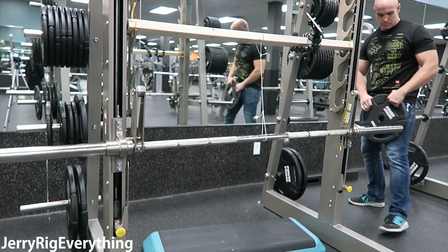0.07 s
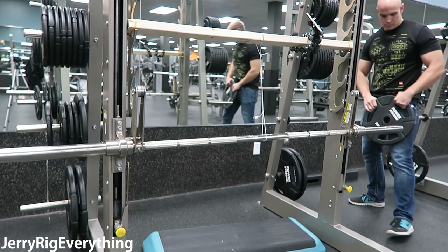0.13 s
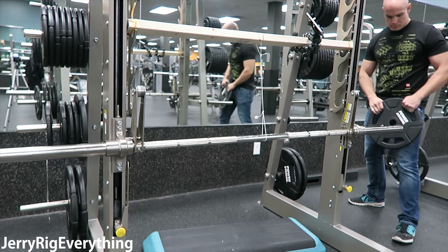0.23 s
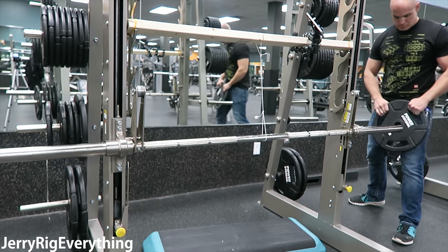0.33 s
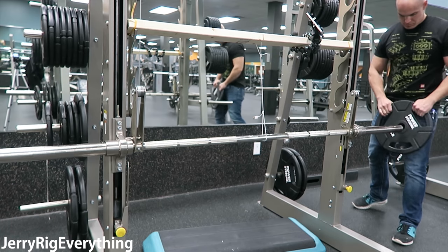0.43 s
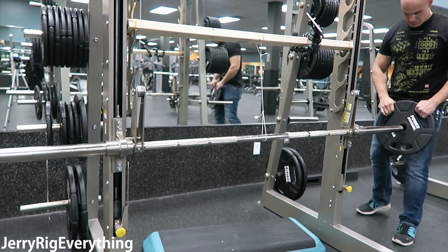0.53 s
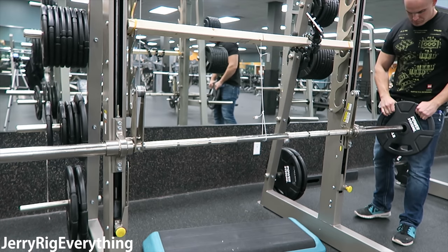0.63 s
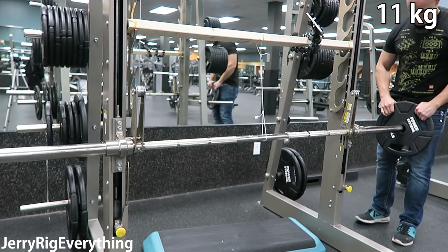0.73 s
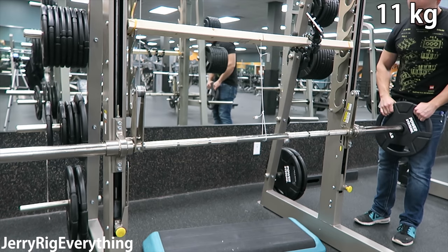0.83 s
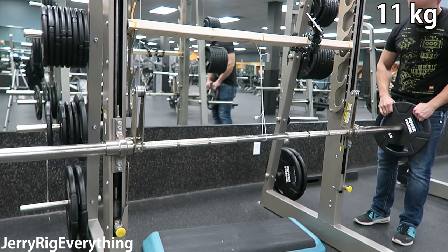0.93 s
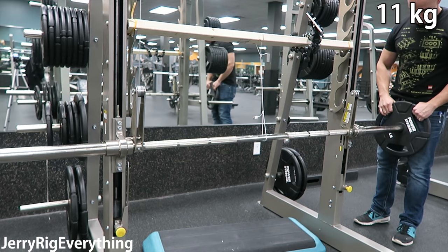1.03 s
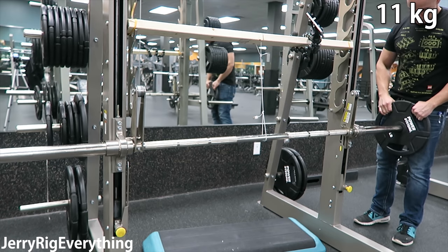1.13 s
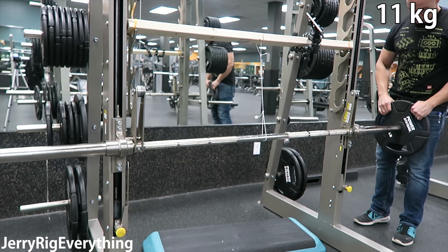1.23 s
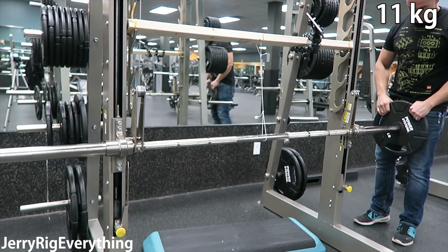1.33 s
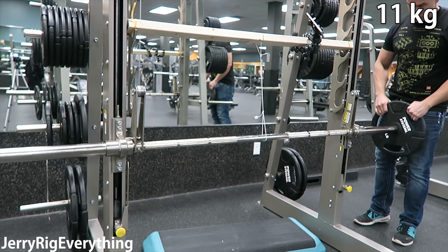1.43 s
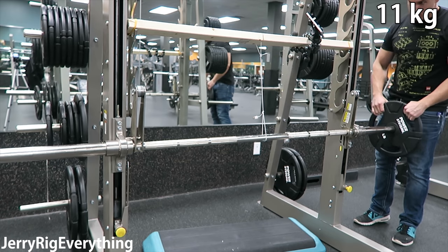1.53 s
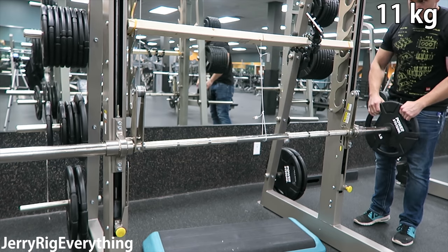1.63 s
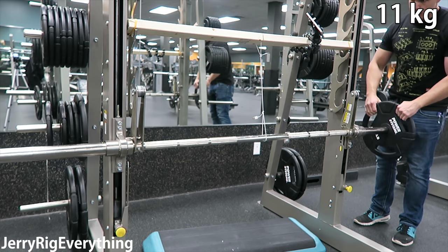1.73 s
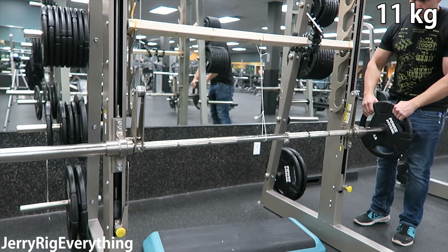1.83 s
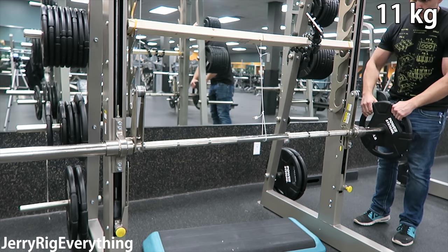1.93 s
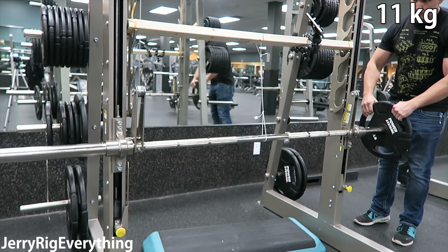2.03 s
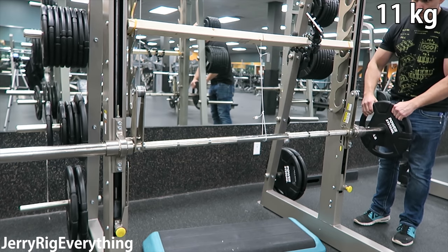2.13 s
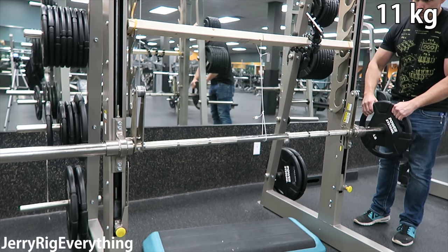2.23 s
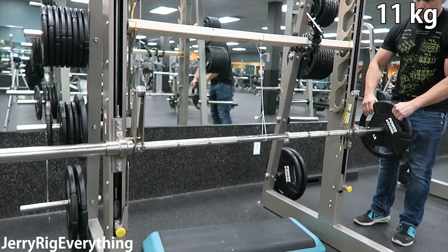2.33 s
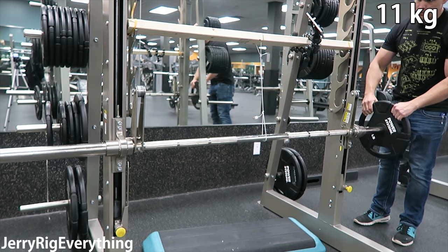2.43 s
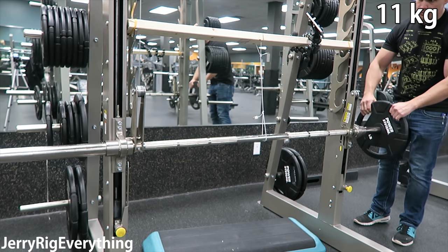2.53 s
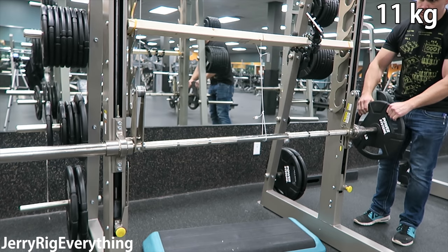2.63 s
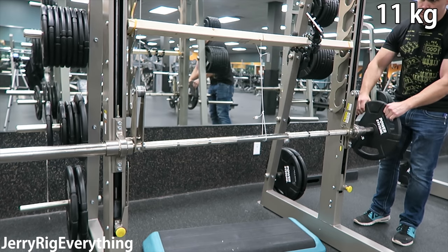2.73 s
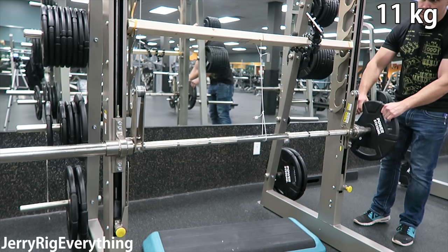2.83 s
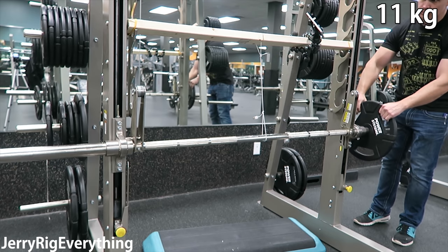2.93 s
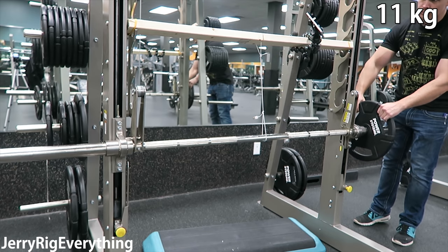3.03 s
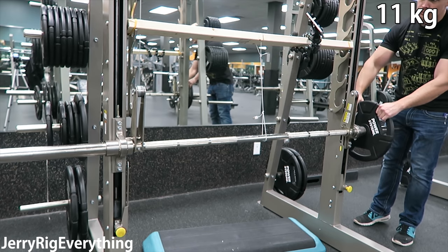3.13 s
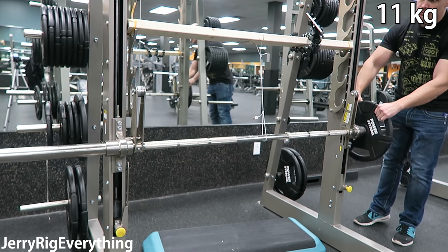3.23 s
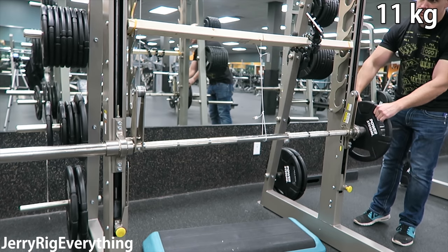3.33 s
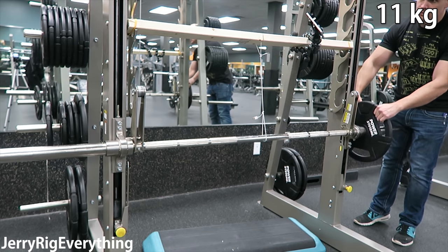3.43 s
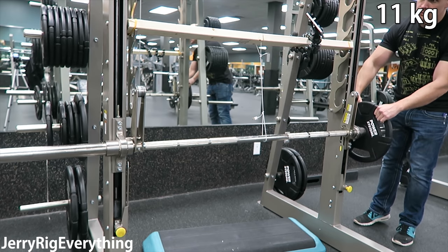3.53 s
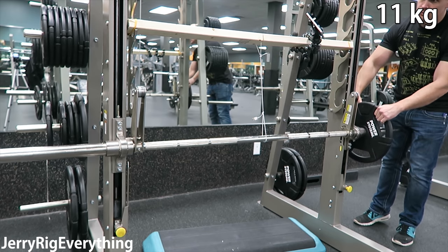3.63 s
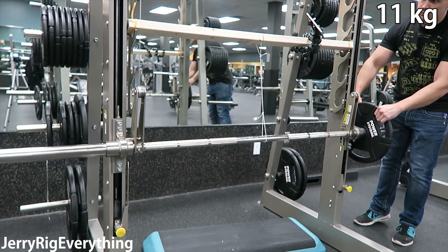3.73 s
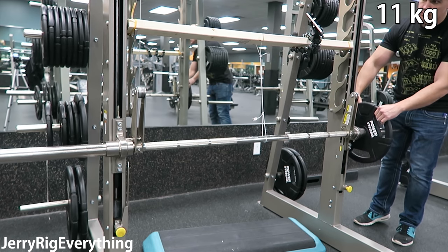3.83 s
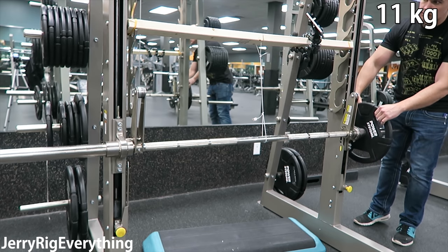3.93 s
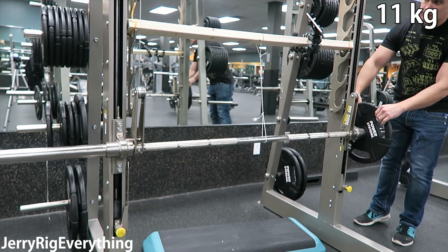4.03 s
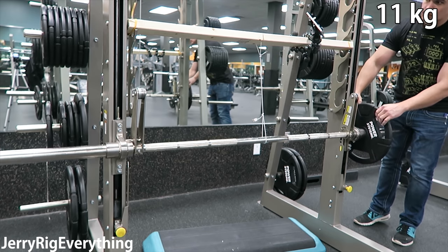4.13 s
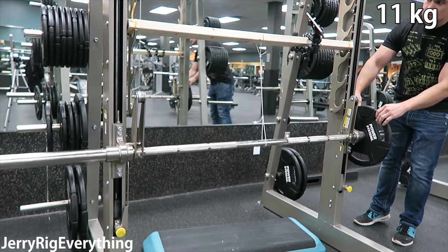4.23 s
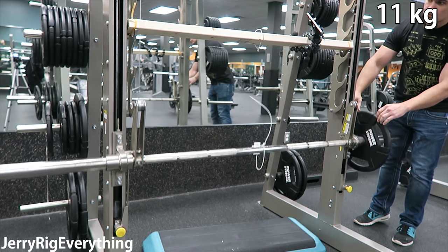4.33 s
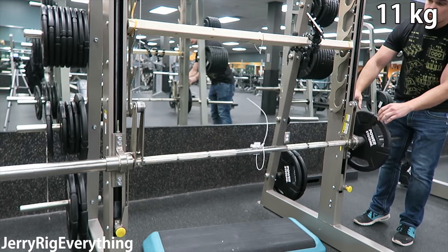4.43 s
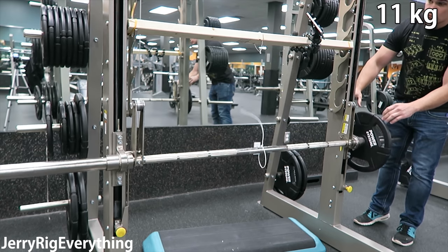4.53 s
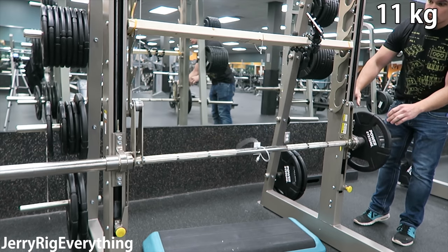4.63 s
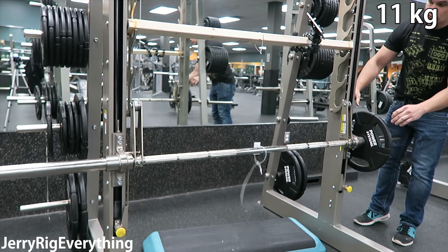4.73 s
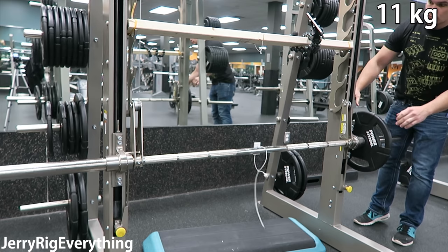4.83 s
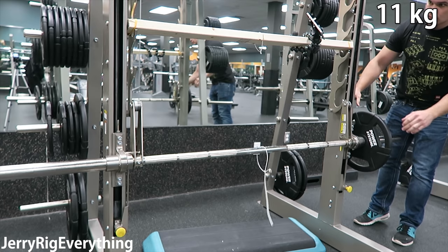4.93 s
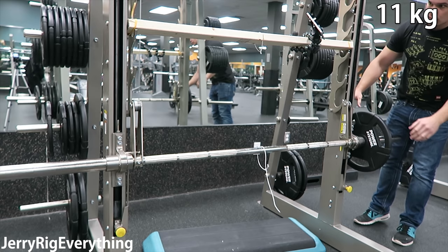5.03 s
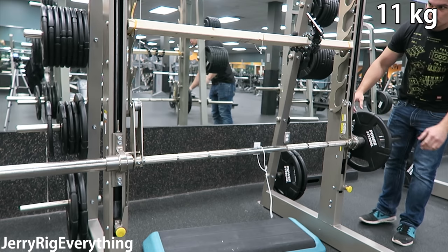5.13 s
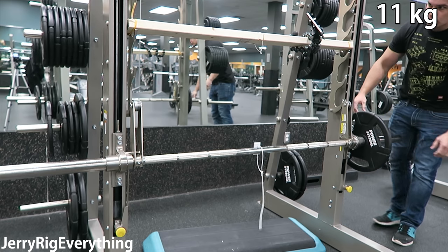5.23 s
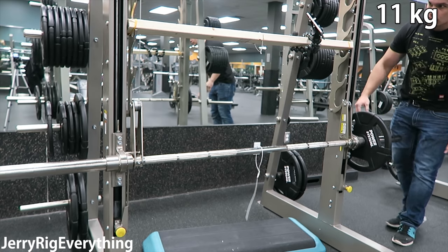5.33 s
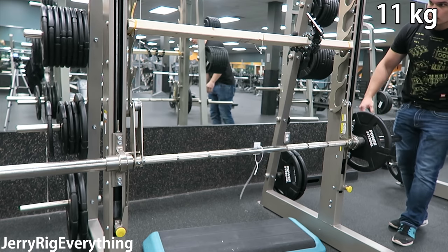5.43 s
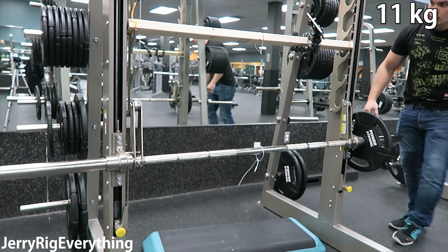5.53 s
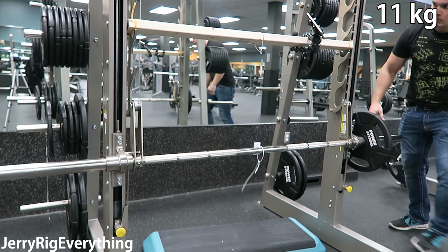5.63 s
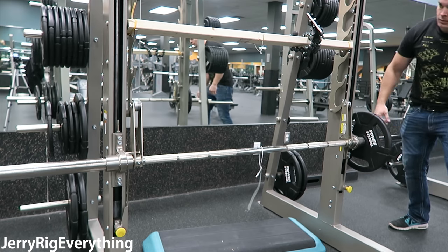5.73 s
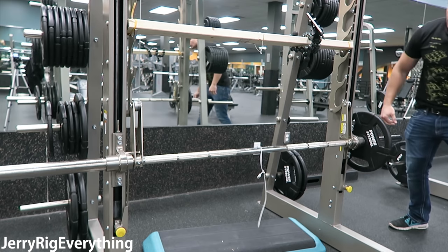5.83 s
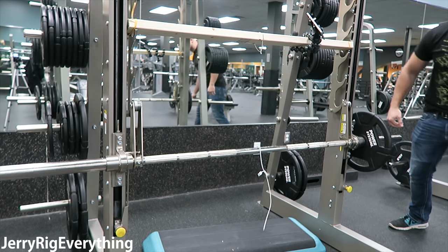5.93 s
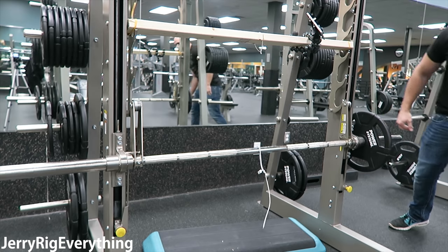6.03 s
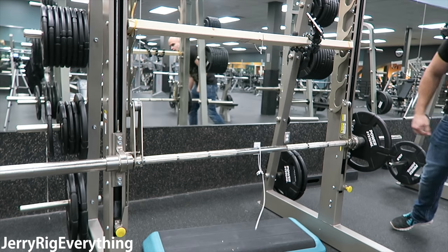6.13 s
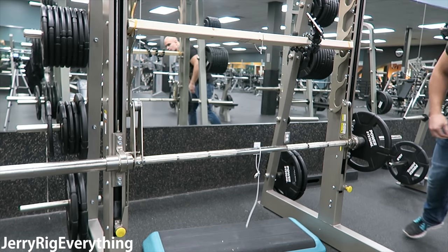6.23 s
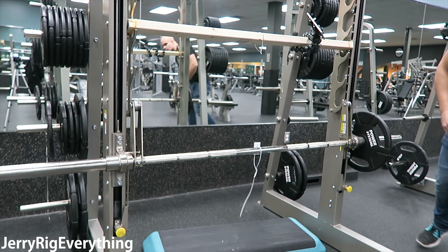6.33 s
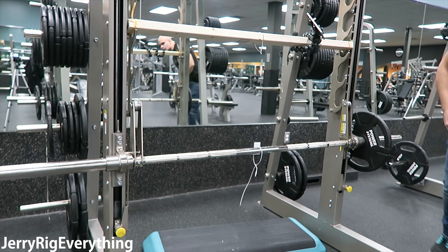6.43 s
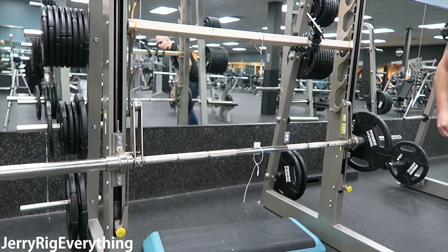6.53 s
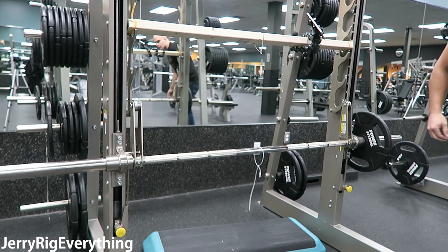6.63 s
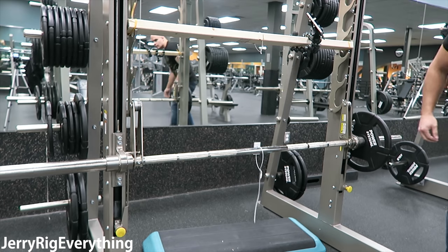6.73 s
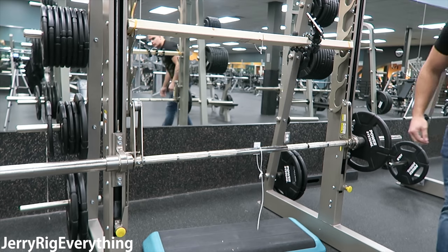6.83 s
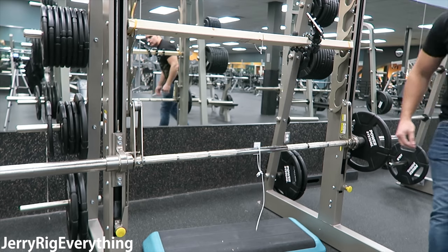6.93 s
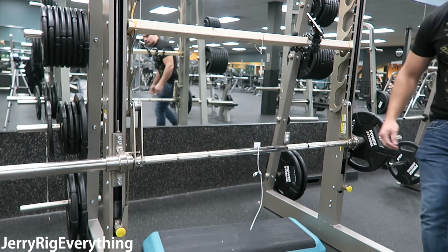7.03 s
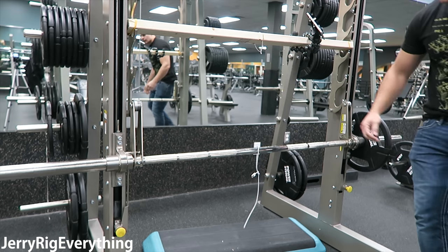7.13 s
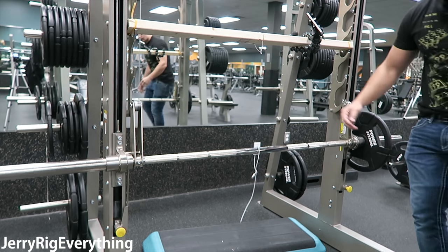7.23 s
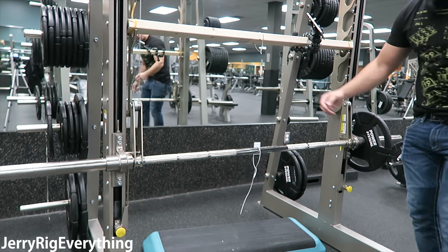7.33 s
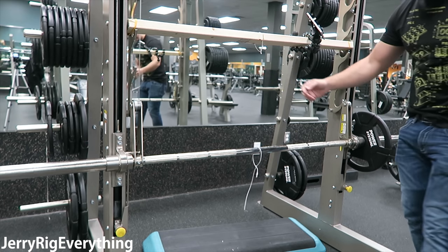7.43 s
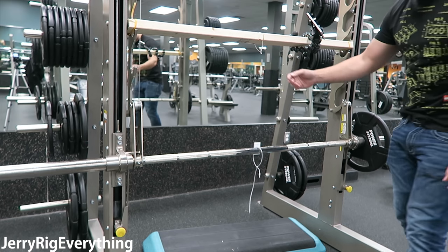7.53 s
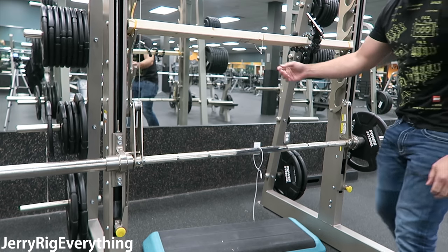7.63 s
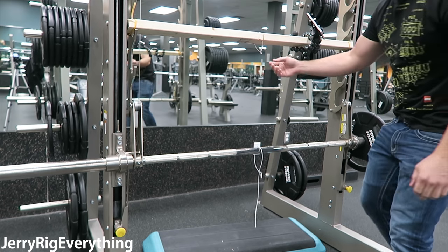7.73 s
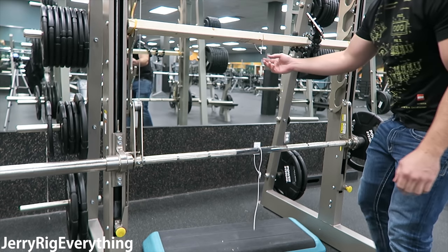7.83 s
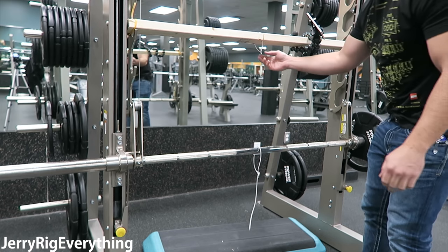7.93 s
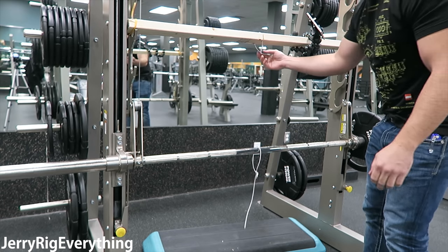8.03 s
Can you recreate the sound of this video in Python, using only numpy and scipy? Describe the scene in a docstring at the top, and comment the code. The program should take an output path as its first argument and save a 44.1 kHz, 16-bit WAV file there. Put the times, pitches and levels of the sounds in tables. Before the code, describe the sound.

In a rumbling gym, an iron plate knocks and scrapes onto a bar, then a hook clacks free and the bar slides down, squealing, to a loud landing.

```python
"""Ventilation rumbles first, as filtered noise, with shoes and clothes stirring nearby as soft noise bursts.
In this gym an iron plate is worked onto a guided barbell's sleeve: knocks ring modes, drags stick and slip.
The bar's hook clacks free on its pegs; the bar slides down its rails with squeals and lands.
Low decaying tones give the weight, steady ones the bar's hum, and diffuse noise tails the room.
An automatic gain sinks while the sound is loud and climbs back afterwards."""
import sys
import numpy as np
from scipy import signal
from scipy.fft import rfft, irfft, next_fast_len
from scipy.io import wavfile
from scipy.ndimage import uniform_filter1d, map_coordinates

SR = 44100
rng = np.random.default_rng(int(sys.argv[2]) if len(sys.argv) > 2 else 0)


def store_wav(level_fs):
    """Save 16-bit WAV to argv[1]."""
    pcm = np.round(np.clip(np.atleast_2d(level_fs), -1, 1) * 32767)
    wavfile.write(sys.argv[1], SR, pcm.T.astype(np.int16))


N = 355798

# All levels apply before the automatic gain.
# ventilation spectrum before the duct lift: (frequency [Hz], relative density [dB/Hz])
AIR_SPECTRUM = [(12, -39), (20, -12.5), (54, 0.5), (101, -7), (137, -0.5), (161, -7.5), (191, -2.5),
                (232, -6), (315, -10.5), (534, -19.5), (958, -21.5), (3260, -32), (6020, -48), (11700, -59),
                (15500, -84)]
# duct resonances: (frequency [Hz], width [Hz], lift [dB])
DUCT_RESONANCES = [(65.6, 14.6, 5.5), (136.3, 5.8, 5.5), (180, 35, 3), (331.5, 34, 4.5)]
# stereo spread of the ventilation: (frequency [Hz], side minus mid [dB])
AIR_SIDE_LEVELS = [(60, -34.5), (110, -23), (200, -16), (380, -4), (700, -5), (1290, -7.5), (2380, -9),
                   (4400, -2.5), (8120, 1), (15000, 2)]
AIR_DB = -35.5  # rms of the mid

# shoes and cloth: (time [s], swish level [dB], thud re swish [dB])
STIR_EVENTS = [(0.12, -54.5, 1), (0.51, -55, -11), (0.845, -47.5, -24), (1.17, -57, 0), (1.37, -51, -14),
               (1.749, -54.5, 7), (2.0, -51.5, 0), (2.1, -56, 5), (3.885, -54.5, -3), (5.485, -57, 15),
               (5.691, -50, -1), (5.985, -70, 23.5), (6.1, -63, 15), (7.411, -46.5, 1.5),
               (7.57, -52.5, -18), (7.81, -50.5, -3), (8.022, -48.5, 1.5)]
STIR_HZ, STIR_SIZZLE_DB, STIR_RING_DB, STIR_RISE_S, STIR_DECAY_S = 1417, -14.5, -26, 0.0032, 0.043

# metal dragging on metal, one list a stroke: (time [s], thud level [dB], clank re thud [dB])
DRAG_STROKES = [
    [(1.06, -58, -20), (1.15, -51, -27), (1.26, -44, -36)],
    [(2.62, -41.5, -27), (2.79, -46.5, -21), (2.91, -40.5, -34), (3.07, -60, -26)],
    [(3.39, -30, -11), (3.5, -47, -10), (3.56, -63, -10)],
    [(4.44, -27.5, -12.5), (4.52, -20, -16), (4.6, -27.5, 7.5), (4.7, -23, -8), (4.8, -28, 3),
     (4.92, -27.5, 5), (4.98, -23.5, -7), (5.03, -29, -14)],
]
DRAG_SIZZLE_DB = -12  # re clank

# plate meeting bar: (time [s], strength [dB], favoured frequency [Hz], sizzle re clank [dB],
# ring re contact noise [dB], contact time [s])
KNOCK_EVENTS = [(1.075, -39.5, 500, -21, -6, 0.091), (1.26, -28.5, 748, -9, 1.5, 0.034),
                (1.28, -35, 2740, -11, -4.5, 0.017), (1.536, -25, 2600, -24.5, 6.5, 0.017),
                (1.546, -26, 2180, -27, -1.5, 0.027), (1.549, -19, 1190, -22, 1, 0.011),
                (1.56, -20.5, 980, -28, 2.5, 0.0061), (1.58, -30, 530, -25, -2, 0.0086),
                (1.594, -35, 1190, -30, 7, .02), (1.608, -34, 975, -28, 8, 0.022),
                (1.784, -51, 2900, -31, 8, 0.013), (2.032, -37, 694, -15, -5, 0.017),
                (2.08, -49.5, 2860, -14, 3, .009), (2.18, -34, 680, -13, -8, 0.029),
                (2.385, -39.5, 1440, -34, -6, 0.026), (2.65, -45, 606, -30, -11, .05),
                (2.8, -34, 1065, -27, 8, 0.04), (2.835, -30.5, 500, -28, 1, 0.013),
                (2.82, -37, 1190, -25, 5, 0.036), (2.939, -36.5, 540, -27, -3, 0.024),
                (3.35, -29.5, 2200, -8, -2, 0.016), (3.357, -28, 2870, -9.5, 4, 0.021),
                (3.372, -27.5, 700, -8, 0, 0.032), (3.412, -37, 990, -12, 5, 0.016),
                (3.463, -41, 1050, -24, 0, .008), (3.478, -48, 3660, -12, 3, 0.013),
                (3.49, -50, 4590, -11, -6, .012), (4.383, -20, 597, -17, -2, 0.015),
                (4.468, -20.5, 2360, -13.5, -5, 0.012), (4.483, -15, 535, -12.5, -0.5, 0.042),
                (4.519, -29, 3300, -3.5, -5.5, 0.018), (4.545, -23.5, 2900, -6, 0, 0.025),
                (4.578, -7, 2120, -17, -9.5, 0.0085), (4.6, -13, 680, -9.5, 3, 0.013),
                (4.618, -28, 2300, -12, -5.5, 0.0059), (4.708, -23.5, 3300, -13, -6, 0.012),
                (4.778, -23.5, 2130, -20.5, 0.5, 0.0056), (4.82, -18, 4000, -11.5, -4.5, 0.0043),
                (4.827, -18.5, 3400, -11.5, -17, 0.015), (4.849, -9, 2780, -13, 3.5, 0.0085),
                (4.862, -9.5, 2850, -16, -6, 0.011), (4.865, -7, 530, -10, -3, 0.0041),
                (4.885, -13.5, 970, -21, -2, 0.017), (4.97, -13.5, 740, -19, -3, 0.021),
                (5.0, -23.5, 620, -35, -2, .015)]
# the lower a knock lands and the weaker it is, the more thud and the less clank
EVEN_HZ, THUD_DB_PER_OCTAVE, FIRM_DB, THUD_DB_PER_DB = 2940, 9.5, -18, 0.7
RISE_SHARE = 0.34  # rise time over contact time

# one mode singing under friction: (time [s], hold [s], frequency [Hz], level before flutter [dB])
SQUEAL_EVENTS = [(1.284, .02, 2874, -40), (1.288, 0.023, 5370, -55), (1.29, 0.026, 4590, -48),
                 (1.312, 0.014, 2925, -42), (1.338, 0.026, 2930, -46), (1.538, 0.014, 2720, -32),
                 (1.54, 0.018, 2330, -28), (1.56, 0.029, 1890, -32), (1.558, 0.015, 977, -20),
                 (1.538, 0.027, 3110, -34), (3.358, 0.016, 2840, -33), (3.358, 0.017, 3700, -35.5),
                 (4.508, .012, 4320, -34), (4.53, .06, 7250, -44), (4.535, 0.047, 3650, -29),
                 (4.544, 0.036, 4560, -27.5), (4.551, .05, 5260, -43), (4.644, 0.043, 4640, -35),
                 (4.65, 0.025, 2890, -38), (4.675, 0.028, 3660, -32), (4.706, 0.021, 4400, -27),
                 (4.71, 0.033, 4770, -31), (4.746, 0.097, 2860, -27), (4.75, .03, 7250, -40.5),
                 (4.775, 0.013, 2120, -19.5), (4.784, 0.017, 4540, -31), (4.822, .012, 4250, -22),
                 (4.875, .03, 2895, -20), (4.885, 0.029, 2225, -18), (4.91, 0.028, 2690, -17),
                 (4.929, 0.033, 2940, -30), (4.969, 0.025, 2760, -22.5), (5.0, 0.033, 2940, -37)]
SQUEAL_RISE_S, SQUEAL_T60_S, SQUEAL_DRIFT_HZ, SQUEAL_FLUTTER_DB = .003, .045, 25, 4
SQUEAL_WAVERS = 130  # random points per second
# faint scattered squeals: (start [s], end [s], mean hold [s], mean level at EVEN_HZ [dB], tilt [dB/octave])
FAINT_SQUEALS = (4.49, 4.98, .014, -35, -6)
FAINT_COUNT = 150

# the weight settling: (time [s], level [dB], frequency [Hz], t60 [s])
THUMP_EVENTS = [(1.575, -27, 198.5, .2), (1.61, -26.5, 209, 0.37), (2.95, -20.5, 512, 0.14),
                (3.374, -12, 486, 0.073), (3.376, -23.5, 234.5, 0.2), (3.397, -21.5, 168, 0.13),
                (3.434, -25, 148, 0.13)]
THUMP_RISE_S = 0.0057

# the hook striking its pegs: (time [s], clank level [dB], thud re clank [dB], favoured frequency [Hz])
CLACK_EVENTS = [(4.032, -19, -24, 2100), (4.22, -14, -10, 1484), (4.324, -25.5, -13, 2170),
                (4.349, -23.5, -16, 2130), (4.371, -18.5, -4, 2060)]
CLACK_SIZZLE_DB, CLACK_RING_DB, CLACK_RISE_S, CLACK_DECAY_S = -19.5, -0.5, 0.00066, 0.0056
# gap, clank change each time, and change of the other bands re clank
REBOUND_S, REBOUND_DB, REBOUND_THUD_DB, REBOUND_SIZZLE_DB = .0085, -8, 8, 11.5

# the bar's longest notes: (frequency [Hz], mean starting level [dB], t60 [s], beating [rad/s])
HUM_NOTES = [(789.5, -26.5, 2.1, 25), (2890, -34, .8, 60), (955, -30, .7, 45)]
HUM_S, HUM_RISE_S = 4.87, .01

# modes of bar and plate: (frequency [Hz], relative level [dB], t60 [s])
IRON_MODES = [(214, -9.5, 0.28), (324.1, -9.5, 0.52), (504, 2, 0.066), (541, 0, 0.12), (638, 8, 0.038),
              (696, 3.5, 0.079), (794, -24, 1.3), (950, -11.5, 0.098), (963, -6, 0.52), (1013, -4.5, 0.26),
              (1190, 1, 0.099), (1337, 9.5, 0.04), (1411, 3, 0.081), (1544, -1, 0.11), (1680, -1, 0.15),
              (1904, -10, 0.13), (2140, -6.5, 0.11), (2220, -8.5, 0.14), (2446, -3, 0.1), (2724, -7, 0.1),
              (2800, -9.5, 0.1), (2900, -6.5, 0.12), (3130, -12.5, .1), (3385, -22, .1), (3665, -13, 0.073),
              (4250, -16, 0.077), (4590, -13, 0.08), (5220, -16, .07), (5560, -19, 0.032),
              (6140, -29.5, 0.051), (7340, -28, 0.065)]
# modes of the hook: (frequency [Hz], relative level [dB], t60 [s])
HOOK_MODES = [(1320, -9, 0.082), (1424, -6, 0.056), (1650, -5, 0.06), (1700, -7, .06), (1860, -2, 0.089),
              (2216, -1, 0.025), (2300, -6, .09), (2600, -7, 0.036), (3150, -8.5, .05), (3270, -14, 0.08),
              (3650, -5, 0.038), (3820, -17.5, 0.05), (4620, -11.5, 0.064), (6300, -28.5, 0.05),
              (7530, -27.5, 0.018), (10400, -29.5, 0.045)]
# noise of iron touching iron: (frequency [Hz], relative density [dB/Hz])
CONTACT_SPECTRUM = [(130, -14.5), (280, 1.5), (500, 17.5), (1000, 10.5), (3200, 0), (3700, -2), (5000, -10),
                    (8000, -21.5), (12000, -24.5), (15500, -47.5)]
# the rack's dense after-rattle, rows for thud, clank and sizzle: (relative level [dB], t60 [s])
RACK_RATTLE = [(-10, 0.71), (-8.5, 0.17), (-9, 0.19)]
WANDER_RAD_PER_KHZ = .35  # phase wander of a loosely held mode

# room decay: (frequency [Hz], t60 [s])
HALL_DECAY = [(200, 1), (1000, 0.98), (4000, 0.69), (12000, 0.15)]
# stereo spread of the near sounds' diffuse part: (frequency [Hz], side minus mid [dB])
NEAR_SIDE_LEVELS = [(60, -28.5), (200, -28), (380, -17), (700, -17.5), (1290, -17), (2380, -19),
                    (4400, -9.5), (8120, -2), (15000, -2.5)]
TOP_HZ = 15700  # band limit


def amp(db):
    """Decibels to amplitude."""
    return 10 ** (np.asarray(db) / 20)


def unit(x):
    """x scaled to an rms of one."""
    return x / np.sqrt(np.mean(x ** 2) + 1e-20)


def along(points, hz):
    """Value at hz between (frequency [Hz], value) points on a log axis."""
    f, v = np.transpose(points)
    return np.interp(np.log(hz + 1), np.log(f + 1), v)


def filtered(x, response):
    """x shaped by a response over frequency."""
    n = x.shape[-1]
    m = next_fast_len(n + 8192)
    return irfft(rfft(x, m) * response(np.fft.rfftfreq(m, 1 / SR)), m)[..., :n]


def ventilation():
    """A broad rush with patches of random gain, lifted at the duct resonances; the bass is nearly mono."""
    z = signal.stft(rng.standard_normal((2, N + 1024)), nperseg=1024)[2]
    patches = uniform_filter1d(rng.standard_normal(z.shape[1:]), size=8, axis=0)
    patches = uniform_filter1d(patches, size=6, axis=1)
    pair = signal.istft(z * amp(1.54 * unit(patches)), nperseg=1024)[1][:, :N]

    def colour(hz):
        lift = 1 + sum((amp(db) - 1) / (1 + (2 * (hz - c) / w) ** 2) for c, w, db in DUCT_RESONANCES)
        side_db = along(AIR_SIDE_LEVELS, hz)
        return lift * amp(along(AIR_SPECTRUM, hz) + [0 * hz, side_db])

    mid, side = filtered(pair, colour)
    return amp(AIR_DB) * np.array([mid + side, mid - side]) / np.std(mid)


def thirds(x):
    """Thud, clank and sizzle bands, which add up to x."""
    thud = filtered(x, lambda hz: 1 / (1 + (hz / 1500) ** 6))
    sizzle = filtered(x, lambda hz: 1 - 1 / (1 + (hz / 5300) ** 8))
    return np.array([thud, x - thud - sizzle, sizzle])


def ringer(modes, length):
    """One fading complex tone a mode."""
    t = np.arange(int(length * SR)) / SR
    hz, db, t60 = np.transpose(modes)[:, :, None]
    onset = 1 - np.exp(-t / .0003)
    return amp(db - 60 * t / t60) * np.exp(2j * np.pi * hz * t) * onset


def contact(force):
    """The broad noise of iron touching iron."""
    return filtered(force, lambda hz: amp(along(CONTACT_SPECTRUM, hz)))


def grit(count):
    """Noise with spikes."""
    return unit(rng.standard_normal(count) * amp(4 * rng.standard_normal(count)))


def loudest(x):
    """Highest short-time rms in the first tenth of a second of each row."""
    power = uniform_filter1d(x[..., :SR // 10] ** 2, size=400, axis=-1)
    return np.sqrt(power.max(axis=-1, keepdims=True))


def blows(table, modes, length):
    """A short chattering force rings the modes, most those near the favoured pitch, and rattles the rack.

    Rows: (time [s], clank [dB], thud re clank [dB], sizzle re clank [dB], ring re contact noise [dB],
    favoured frequency [Hz], rise [s], contact time [s])."""
    out = np.zeros(N + 2 * SR)
    t = np.arange(int(length * SR)) / SR
    sines = ringer(modes, length)
    mode_hz = np.transpose(modes)[0]
    rattle_db, rattle_t60 = np.transpose(RACK_RATTLE)[:, :, None]

    # loose contact makes every mode waver in level and phase until the parts settle
    settle = np.exp(-t / .3)
    knots = rng.standard_normal((len(modes), int(2 * length * 70) + 2))
    knot_times = np.arange(2 * len(t)) * 70 / SR  # 70 knots a second
    wander = np.array([np.interp(knot_times, range(len(k)), k) for k in knots])
    phase = WANDER_RAD_PER_KHZ * mode_hz[:, None] / 1000 * wander[::-1]
    loose = amp(4 * wander) * np.exp(1j * phase)

    for s, db, thud_db, sizzle_db, ring_db, favoured_hz, rise, touch in table:
        def near(hz, octaves):
            return np.exp(-(np.log2(hz / favoured_hz + 1e-9) / octaves) ** 2)

        start = 1 - np.exp(-(t / max(rise, 1e-4)) ** 2)
        force = start * np.exp(-t / touch) * grit(len(t))
        noise = filtered(contact(force), lambda hz: amp(8.2 * near(hz, 0.3)))

        strengths = amp(15 * near(mode_hz, .1) + 2.5 * rng.standard_normal(len(modes)))
        strengths *= rng.choice([-1, 1], len(modes))
        offset = rng.integers(len(t))
        waver = 1 + (loose[:, offset:][:, :len(t)] - 1) * settle
        ring = start * (strengths @ (sines * waver)).imag

        rattle = amp(-60 * t / rattle_t60) * thirds(contact(rng.standard_normal(len(t))))
        rattle /= np.std(rattle[:, :SR // 100], axis=1)[:, None]
        bands = thirds(noise / loudest(noise) + amp(ring_db) * ring / loudest(ring))
        bands = bands / loudest(bands) + start * rattle * amp(rattle_db)
        out[round(s * SR):][:len(t)] += amp(db + np.array([thud_db, 0, sizzle_db])) @ bands
    return out[:N]


def stirs():
    """Shoes and cloth: soft noise swishes and steps that barely ring the iron."""
    rows = [(s, db, thud_db, STIR_SIZZLE_DB, STIR_RING_DB, STIR_HZ, STIR_RISE_S, STIR_DECAY_S)
            for s, db, thud_db in STIR_EVENTS]
    return blows(rows, IRON_MODES, length=0.22)


def drags():
    """Stick and slip: a gritty, uneven force keeps the iron humming, the favoured modes changing as it slides."""
    out = np.zeros(N + 2 * SR)
    sines = ringer(IRON_MODES, .4).imag
    step = SR // 30
    for rows in DRAG_STROKES:
        s, thud_db, clank_db = np.transpose(rows)
        t = np.arange(s[0], s[-1] + .4, 1 / SR)  # leaves 0.4 s for the ring
        held = np.clip(np.minimum(t - s[0], s[-1] - t) / .02, 0, 1)
        knots = rng.standard_normal(len(t) // 400 + 4)
        catches = map_coordinates(knots, [np.arange(len(t)) / 400])
        force = held * grit(len(t)) * amp(2.5 * catches)

        sound = np.pad(contact(force), (0, SR))
        for k in range(0, len(t) - 2 * step, step):
            ring = amp(-39 + 4.5 * rng.standard_normal(len(sines))) @ sines
            push = force[k:k + 2 * step] * np.hanning(2 * step)
            sound[k:][:2 * step + len(ring) - 1] += signal.fftconvolve(push, ring)

        bands = thirds(sound[:len(t)])
        bands /= np.sqrt(np.mean(bands[:, held > 0] ** 2, axis=1, keepdims=True))
        curves = (thud_db, thud_db + clank_db, thud_db + clank_db + DRAG_SIZZLE_DB)
        levels = [np.interp(t, s, curve) for curve in curves]
        out[round(s[0] * SR):][:len(t)] += np.sum(amp(levels) * bands, axis=0)
    return out[:N]


def knocks():
    """Plate on bar: favoured pitch and strength of the blow set its colour, the contact time its attack."""
    rows = []
    for s, db, hz, sizzle_db, ring_db, touch in KNOCK_EVENTS:
        thud_db = np.log2(EVEN_HZ / hz) * (THUD_DB_PER_OCTAVE + THUD_DB_PER_DB * (FIRM_DB - db))
        clank_db = db - max(thud_db, 0)
        rows.append((s, clank_db, thud_db, sizzle_db, ring_db, hz, RISE_SHARE * touch, touch))
    return blows(rows, IRON_MODES, length=.6)


def squeals():
    """Friction holds one mode singing: a tone swells, wavers and dies; the long slide scatters faint ones."""
    out = np.zeros(N + SR)
    t = np.arange(SR // 5) / SR
    upper = [hz for hz, _, _ in IRON_MODES if hz > 2000]
    start, end, mean_hold, mean_db, db_per_octave = FAINT_SQUEALS
    faint = []
    for a, b, c, d, e in rng.random((FAINT_COUNT, 5)):
        hz = upper[int(c * len(upper))] * (1 + .1 * (d - .5))
        db = mean_db + 8 * (e - .5) + db_per_octave * np.log2(hz / EVEN_HZ)
        faint.append((start + (end - start) * a, mean_hold * (.5 + b), hz, db))

    for s, hold, hz, db in list(SQUEAL_EVENTS) + faint:
        knots = rng.standard_normal((2, 60))
        flutter, drift = [map_coordinates(k, [t * SQUEAL_WAVERS], order=3) for k in knots]
        swell = 1 - np.exp(-(t / SQUEAL_RISE_S) ** 2)
        fade = amp(-60 * np.maximum(t - hold, 0) / SQUEAL_T60_S)
        phase = 2 * np.pi * np.cumsum(hz + SQUEAL_DRIFT_HZ * drift) / SR
        level = amp(db + SQUEAL_FLUTTER_DB * flutter)
        out[round(s * SR):][:len(t)] += level * swell * fade * np.sin(phase)
    return out[:N]


def thumps():
    """The plate's weight settling: a low push through the rack, as a quickly decaying sine."""
    out = np.zeros(N + SR)
    t = np.arange(SR // 3) / SR
    for s, db, hz, t60 in THUMP_EVENTS:
        shape = (1 - np.exp(-(t / THUMP_RISE_S) ** 2)) * amp(db - 60 * t / t60)
        out[round(s * SR):][:len(t)] += shape * np.sin(2 * np.pi * (hz * t + rng.random()))
    return out[:N]


def clacks():
    """Every strike of the hook rebounds twice, its clank weaker and its spectrum broader."""
    rows = []
    for s, db, thud_db, hz in CLACK_EVENTS:
        for k in range(3):  # the strike, then two rebounds
            rebound = k > 0
            rows.append((s + k * REBOUND_S, db + k * REBOUND_DB, thud_db + rebound * REBOUND_THUD_DB,
                         CLACK_SIZZLE_DB + rebound * REBOUND_SIZZLE_DB, CLACK_RING_DB, hz,
                         CLACK_RISE_S, CLACK_DECAY_S))
    return blows(rows, HOOK_MODES, length=.35)


def hum():
    """From the landing on the bar sings its longest-lived notes, each slowly beating as it fades."""
    t = np.maximum(np.arange(N) / SR - HUM_S, 0)
    notes = 0
    for hz, db, t60, beat in HUM_NOTES:
        level = amp(db + 2 * np.sin(beat * t) - 60 * t / t60)
        notes = notes + level * np.sin(2 * np.pi * hz * t)
    return notes * (1 - np.exp(-t / HUM_RISE_S))


def hall(x, t60_share):
    """A diffuse answer to x from a noise tail, even in energy over frequency; each frequency has its own t60."""
    hz, t, z = signal.stft(rng.standard_normal(SR), SR, nperseg=256)
    t60 = t60_share * along(HALL_DECAY, hz)[:, None]
    tail = signal.istft(z * amp(-60 * t / t60) / np.sqrt(t60), SR, nperseg=256)[1]
    return signal.fftconvolve(x, tail / np.linalg.norm(tail))[:N]


def scene():
    """Near sounds, their reverberation and a diffuse stereo difference with a turning pattern, over the air."""
    near = stirs() + drags() + knocks() + squeals() + thumps() + clacks() + hum()
    turn = np.pi * np.arange(N) / SR / .12  # half a turn each 0.12 s, between two independent tails
    answer = hall(near * np.cos(turn), 1) + hall(near * np.sin(turn), 1)
    mid = near + amp(-13.5) * np.pad(answer, (300, 0))[:N]  # 300 samples of pre-delay
    shifting = hall(near * np.cos(turn), .25) + hall(near * np.sin(turn), .25)
    side = filtered(shifting, lambda hz: amp(along(NEAR_SIDE_LEVELS, hz)))
    balance = amp([[.1], [-.1]])  # dB, left and right
    return balance * np.array([mid + side, mid - side]) + ventilation()


def gain_control(x, limit_db, depth_db, window, fall_db, climb_db):
    """Gain sinks while the recent loudness is over the limit, then climbs; window in s, speeds in dB/s."""
    power = np.mean(x[:, :N // 441 * 441].reshape(2, -1, 441) ** 2, axis=(0, 2))  # steps of 10 ms
    recent = signal.lfilter([.01 / window], [1, .01 / window - 1], power)
    gain, gains = 0, []
    for loud in recent > amp(2 * limit_db):  # doubled dB: a power limit
        change = -fall_db if loud else climb_db
        gain = np.clip(gain + change / 100, -depth_db, 0)
        gains.append(gain)
    return amp(np.interp(np.arange(N) / 441, np.arange(len(gains)), gains))


def record(dry):
    """Gain control, soft clipping at full scale, and the band limit."""
    x = dry * gain_control(dry, limit_db=-22, depth_db=12.5, window=.15, fall_db=27, climb_db=13)
    x = x / (1 + np.abs(x) ** 6) ** (1 / 6)
    return filtered(x, lambda hz: hz < TOP_HZ)


dry = scene()
out = record(dry)
store_wav(out)
```